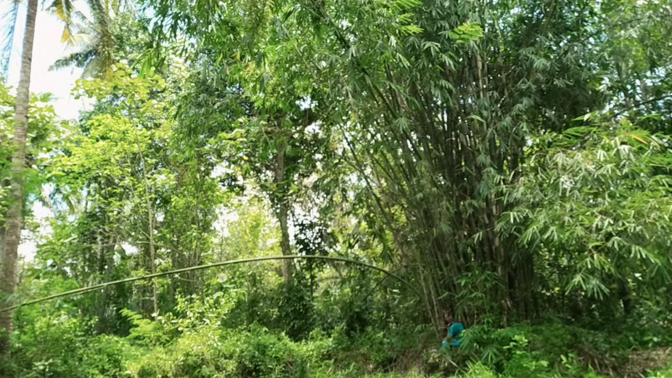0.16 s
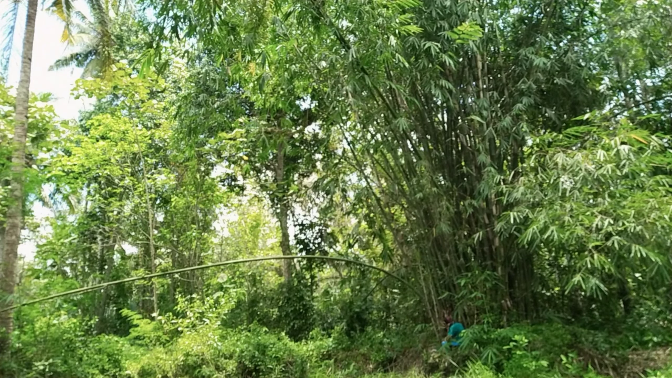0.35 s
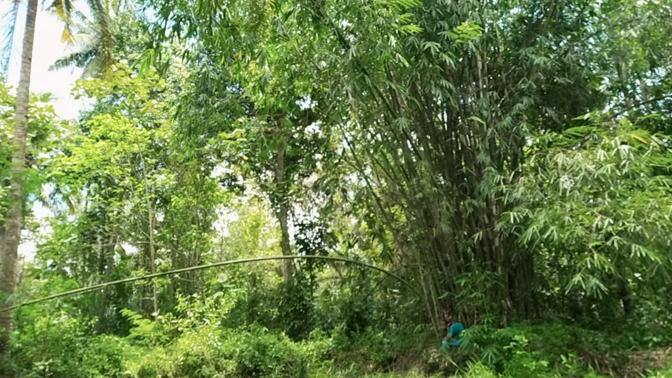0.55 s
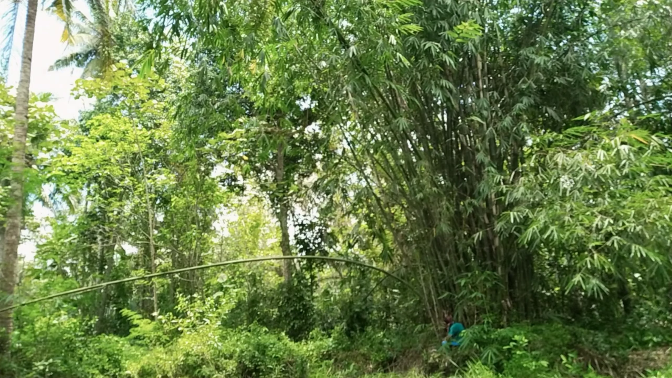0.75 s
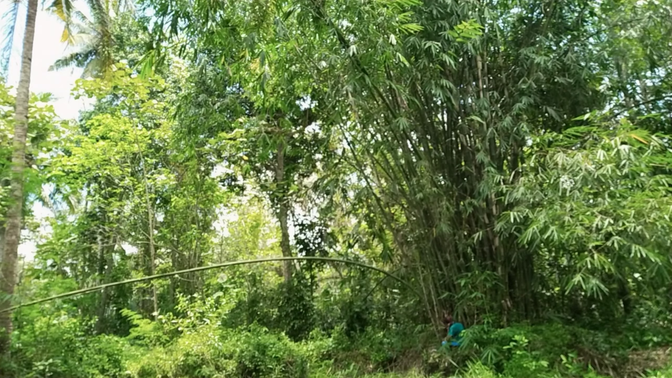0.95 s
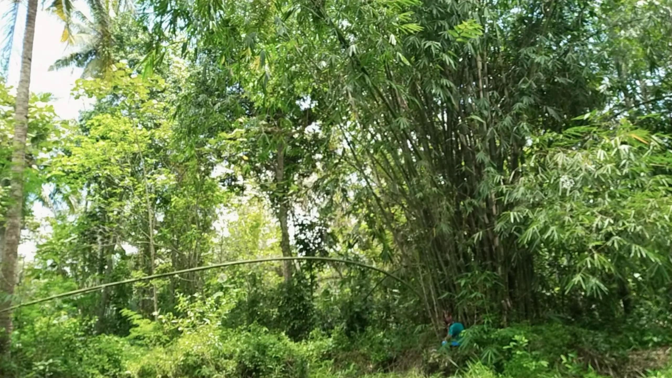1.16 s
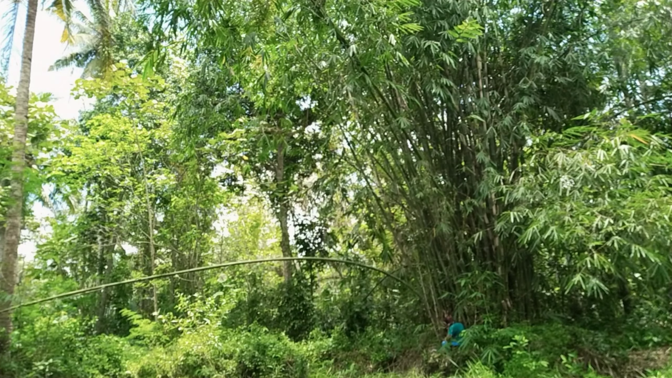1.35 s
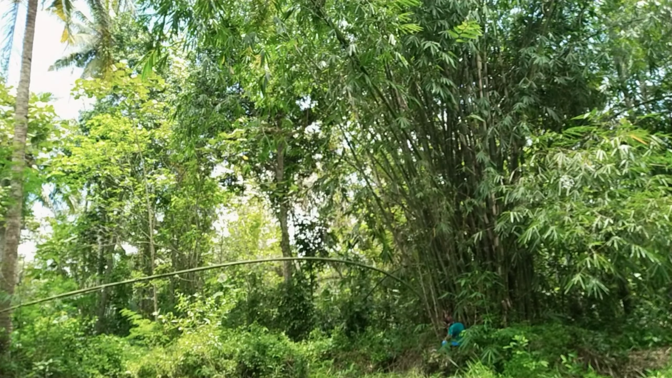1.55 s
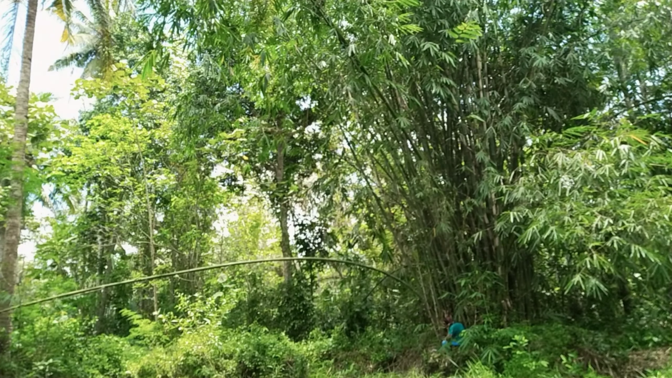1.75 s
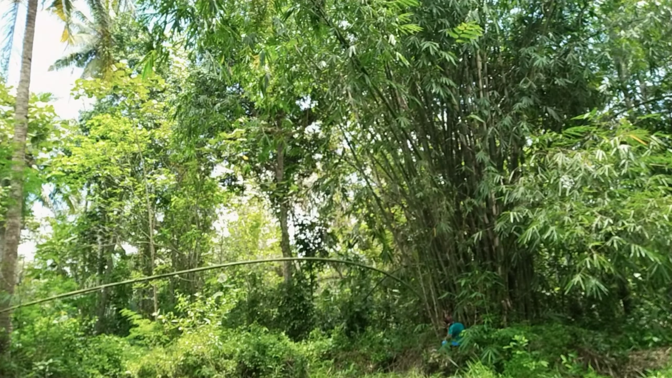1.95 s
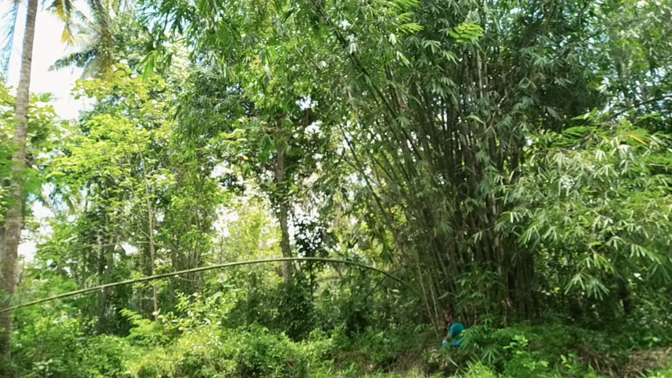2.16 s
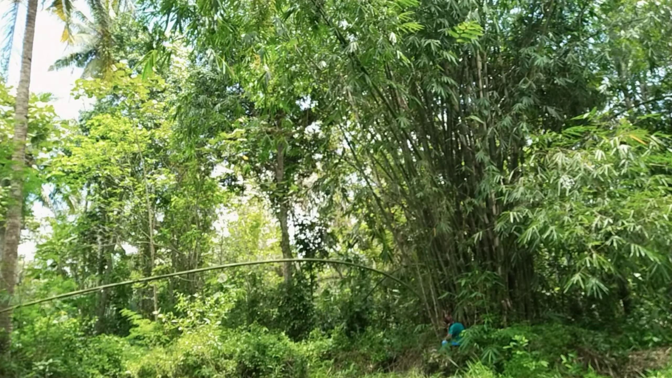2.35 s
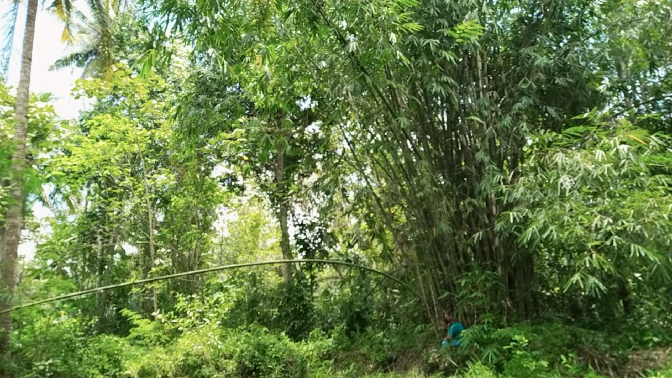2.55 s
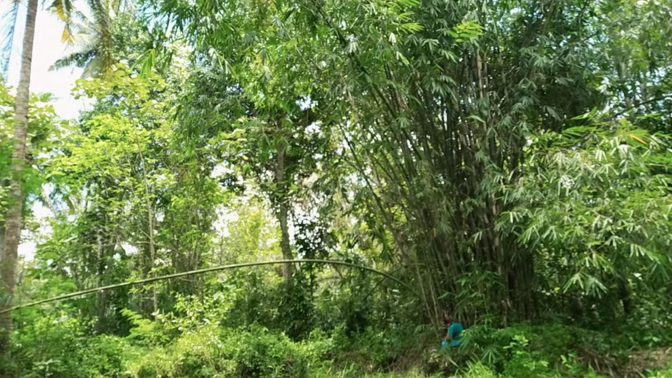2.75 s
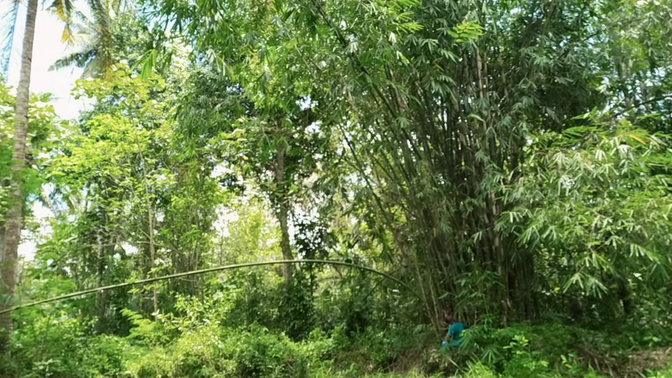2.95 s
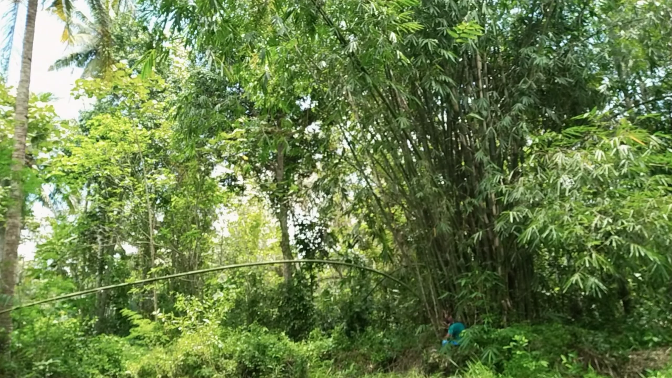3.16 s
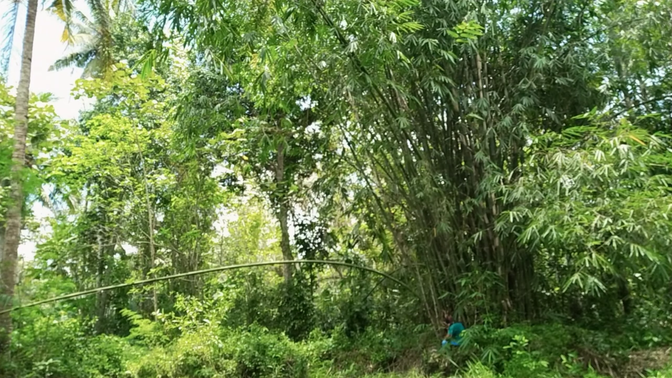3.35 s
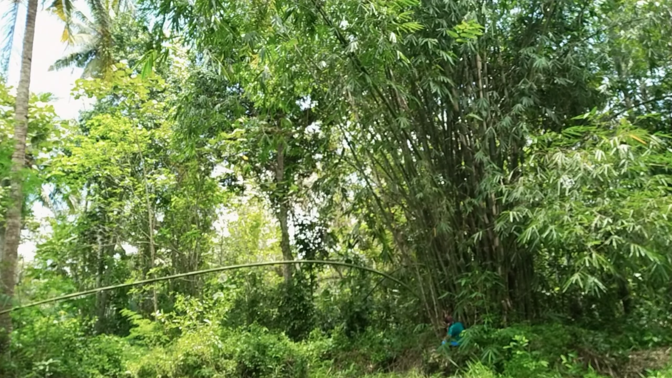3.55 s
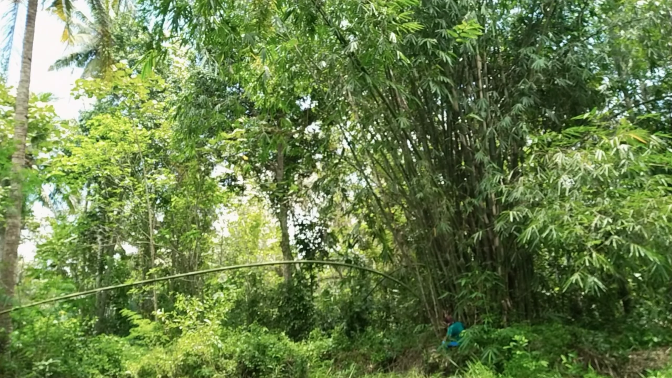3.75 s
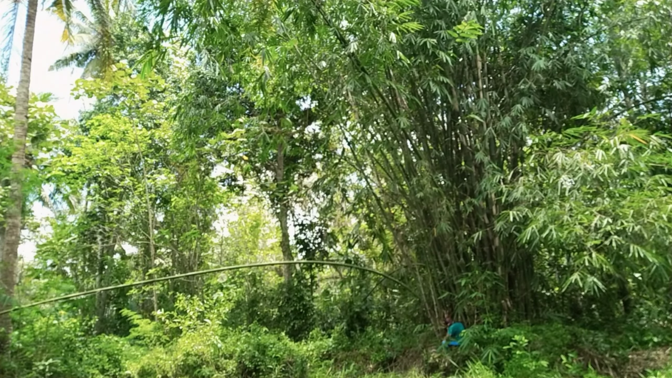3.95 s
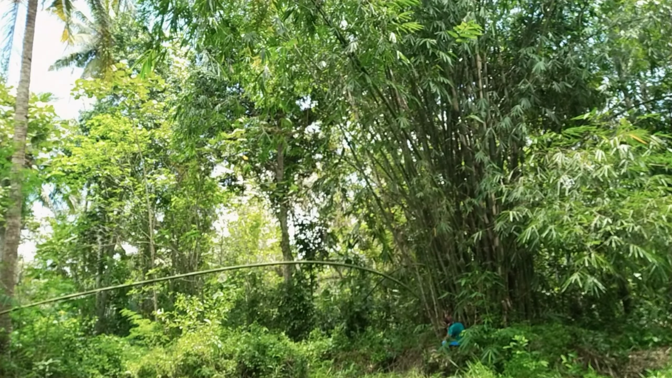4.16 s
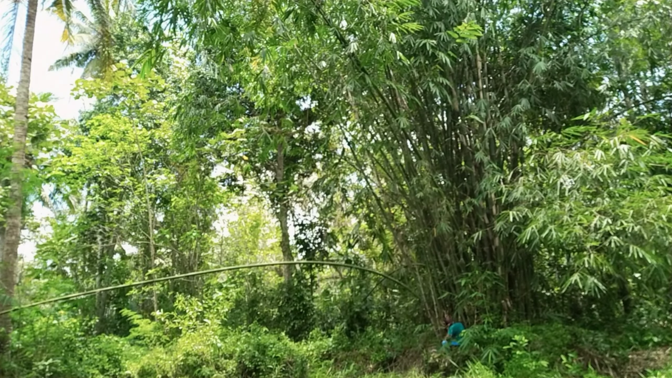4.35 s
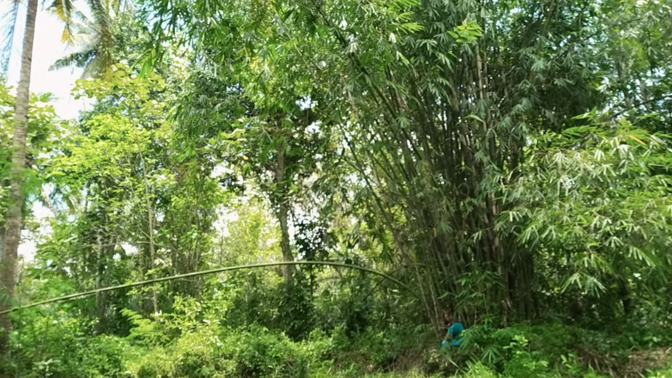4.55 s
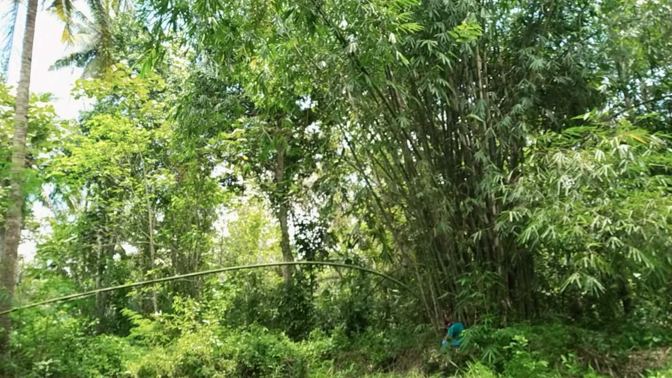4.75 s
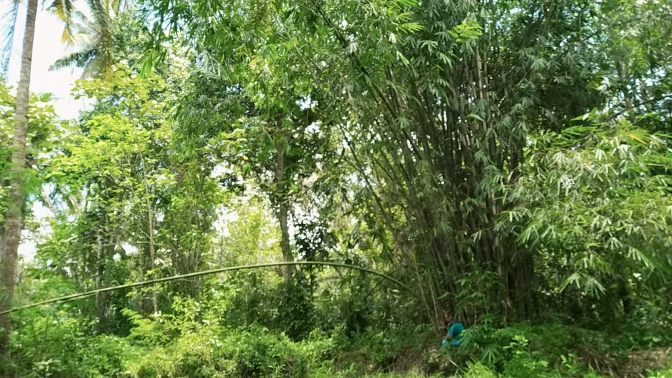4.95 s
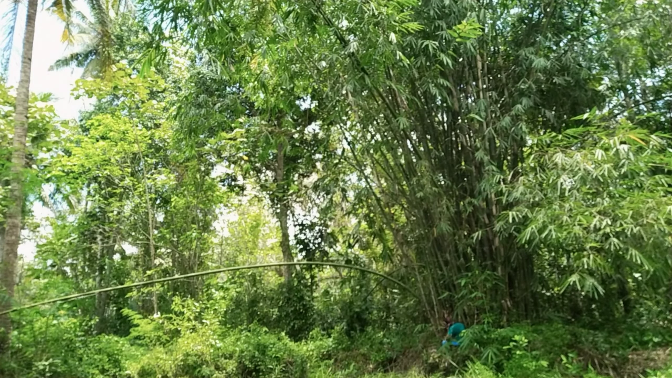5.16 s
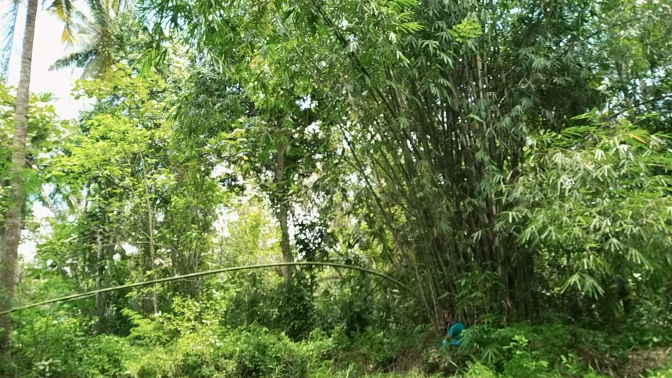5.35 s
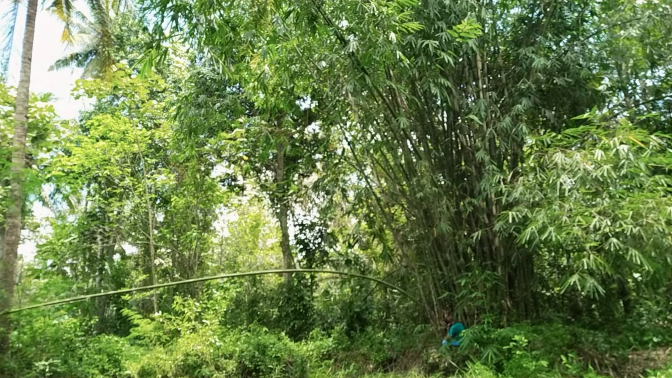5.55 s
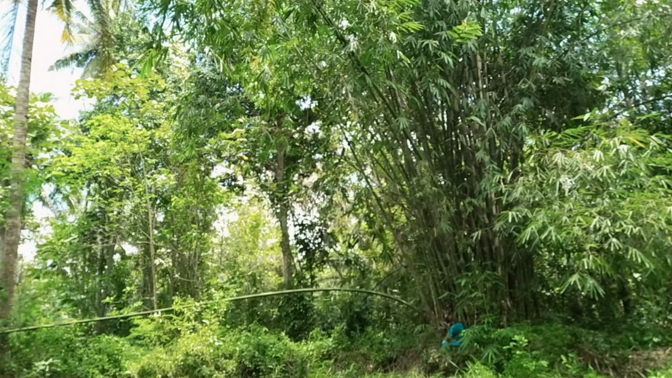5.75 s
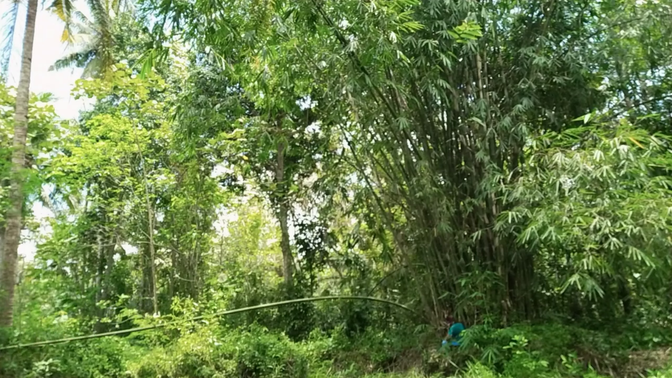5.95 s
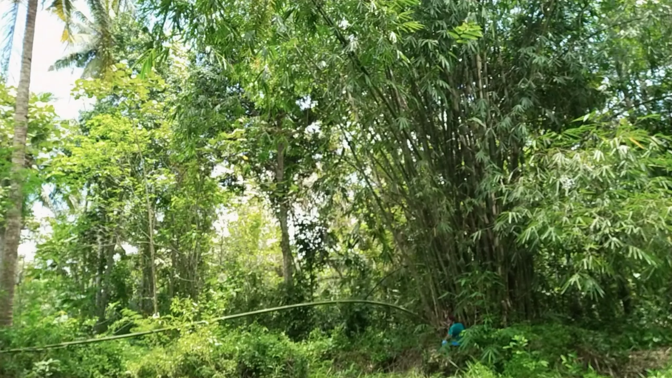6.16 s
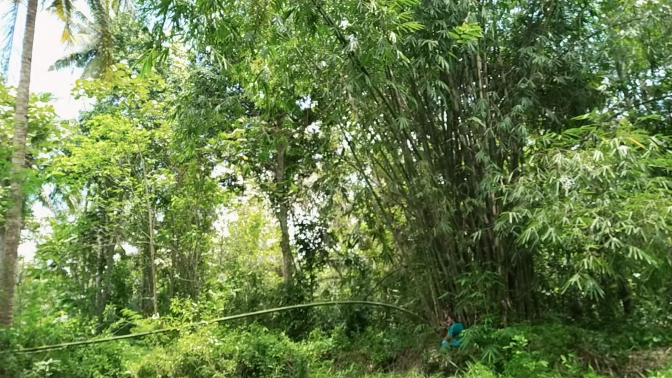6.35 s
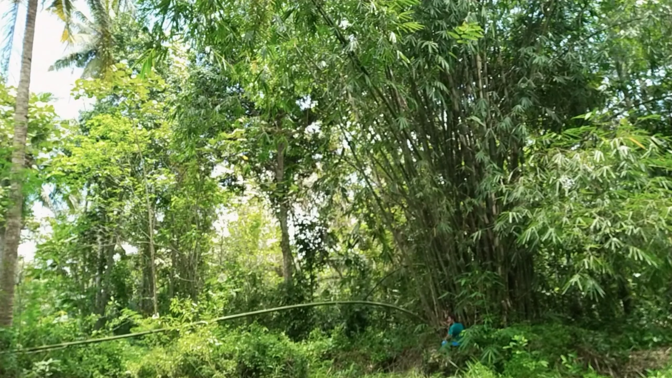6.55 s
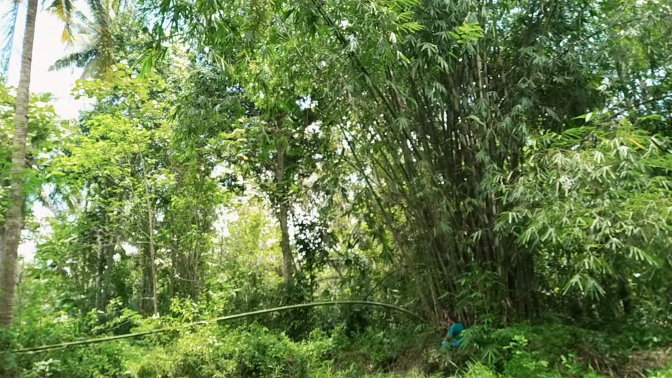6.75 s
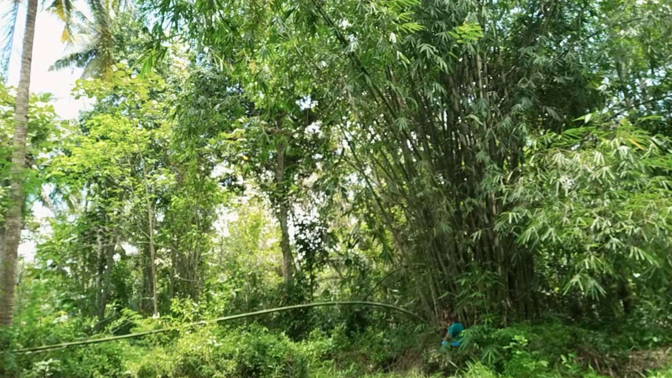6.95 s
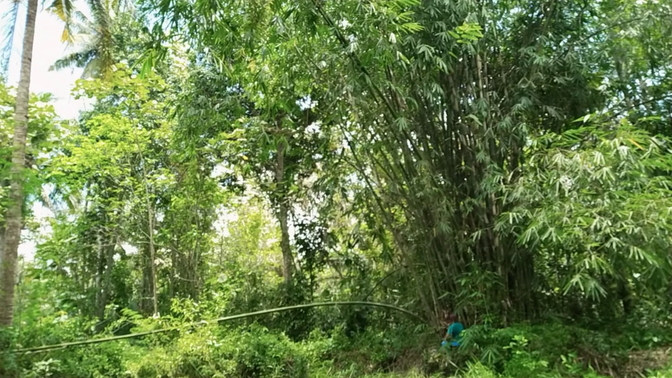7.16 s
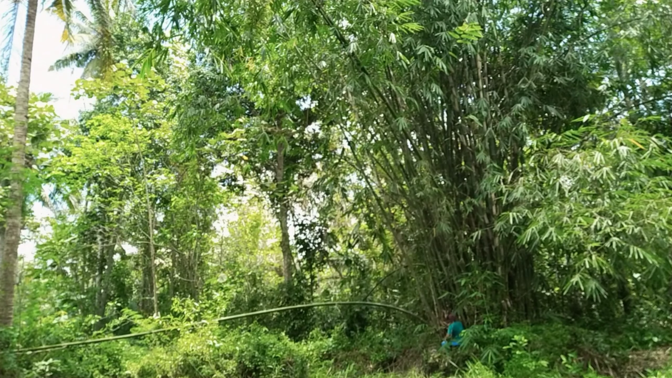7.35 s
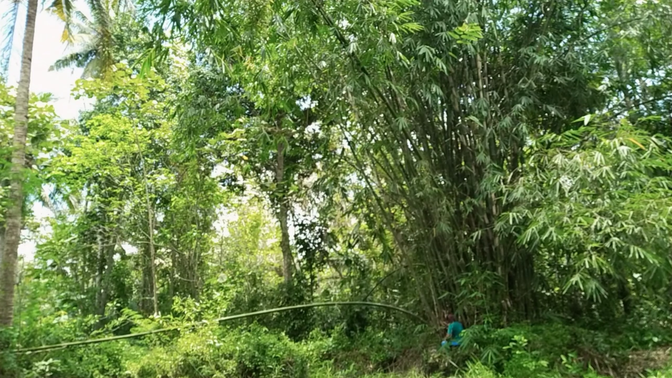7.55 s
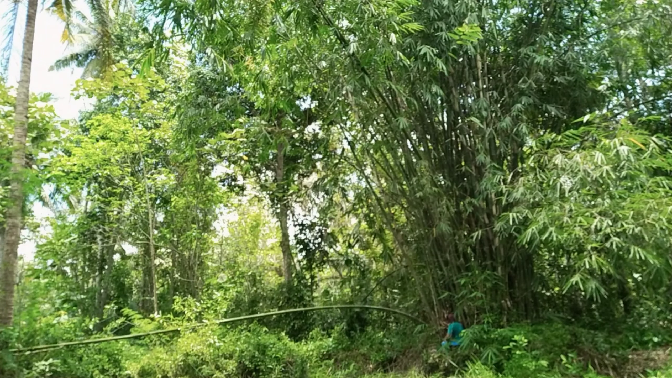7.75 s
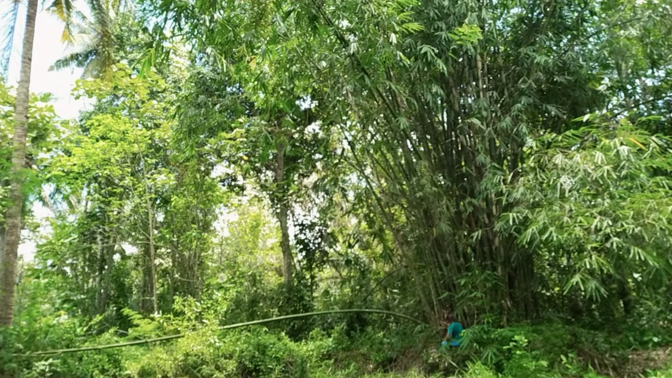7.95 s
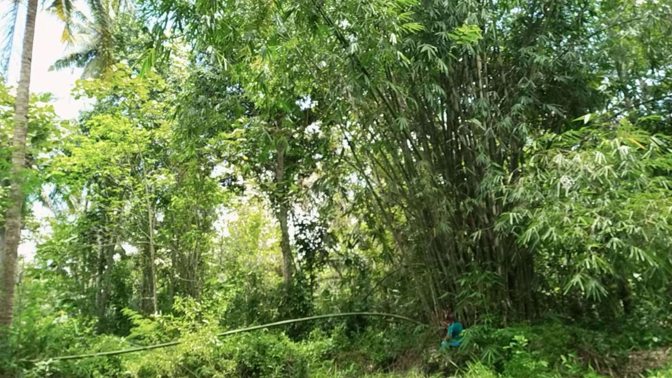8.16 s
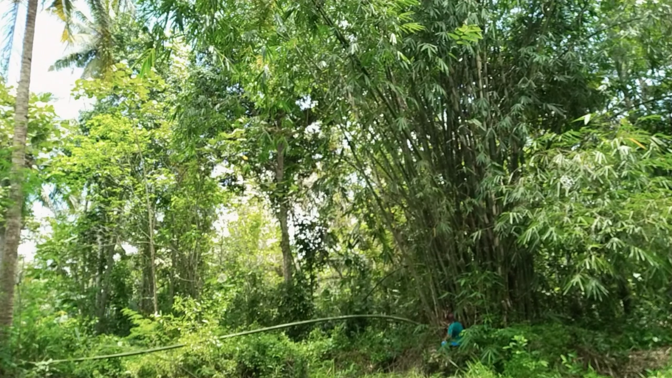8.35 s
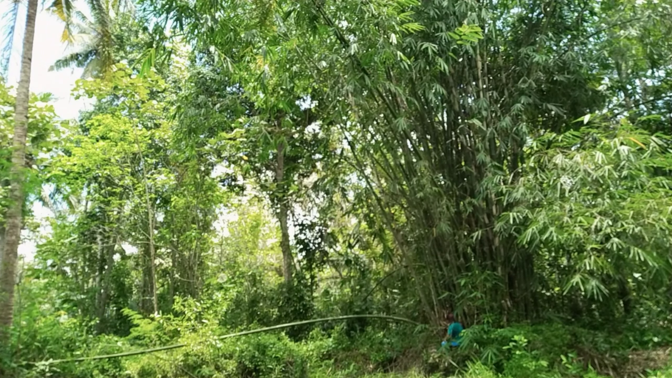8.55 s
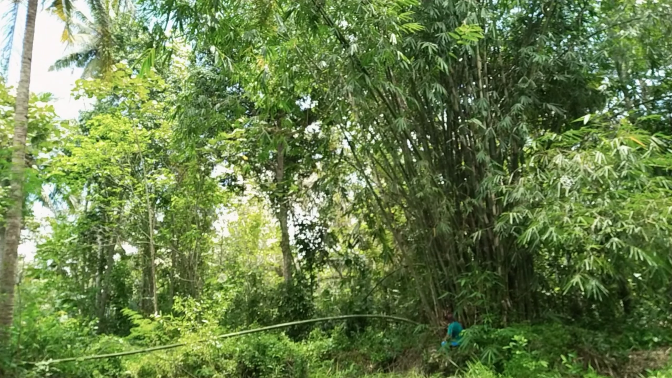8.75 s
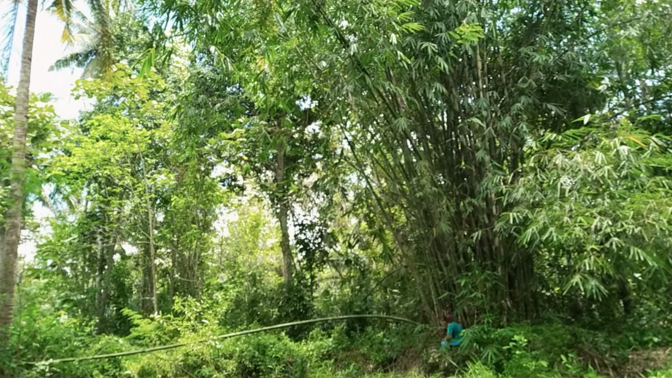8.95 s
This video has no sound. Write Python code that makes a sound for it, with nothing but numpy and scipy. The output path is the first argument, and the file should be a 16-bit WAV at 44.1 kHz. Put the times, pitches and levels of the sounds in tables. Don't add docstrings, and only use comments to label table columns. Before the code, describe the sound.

Distant blade chops hollow bamboo in a grove amid cicadas and birds, then a cut to close rustling leaves and one hard splitting crack.

```python
import sys
import numpy as np
from scipy import signal
from scipy.fft import rfft, irfft, next_fast_len
from scipy.io import wavfile
from scipy.ndimage import uniform_filter1d, map_coordinates

SR = 44100
rng = np.random.default_rng(int(sys.argv[2]) if len(sys.argv) > 2 else 0)


def generate_wav(signal):
    frames = np.transpose(np.atleast_2d(signal))
    scaled = np.clip(frames, -1, 1) * 32767
    pcm = np.round(scaled).astype(np.int16)
    wavfile.write(sys.argv[1], SR, pcm)


def voltage_ratio(level):
    return 10 ** (np.asarray(level, float) / 20)


N = 396900
TIME = np.arange(N) / SR
CUT_S = 5.8535

# (frequency [Hz], level [dB per Hz])
FAR_AIR = [(12, -39), (20, -10.5), (120, -1.5), (193, -6), (624, -26.5), (1570, -14.5), (2020, -18.5),
           (4300, -21), (5680, -25), (6360, -25.5), (8180, -31), (10500, -15), (11800, -39), (14700, -26),
           (16000, -37)]
NEAR_AIR = [(12, -34), (20, -1.5), (70, 0.5), (134, -6.5), (277, -21.5), (325, -23), (417, -23), (804, -14),
            (3510, -24.5), (4200, -38), (4500, -25.5), (5850, -39), (9900, -120)]
# (frequency [Hz], level [dB per Hz])
LEAVES = [(400, -24), (900, -16), (2100, -6), (4500, -12), (6500, -13.5), (8300, -8), (11000, -13.5),
          (14500, -7.5), (16000, -7)]
# (crest [s], level [dB], rise [s], fall [dB/s])
SHAKES = [
    (5.86, -50, .02, 30),
    (6.15, -57.5, 0.22, 15),
    (7.17, -64, .05, 70),
    (7.44, -58, 0.086, 90),
    (7.68, -45.5, 0.085, 42),
    (8.06, -51.5, 0.48, 28),
    (8.86, -66, 0.054, 52),
]
# (swell rate [1/s], time of one crest [s])
FAR_SINGERS = [(14.2, 1.555), (15.17, 4.097)]
# (time [s], level [dB])
CRICKET = [(0.1, -84), (0.9, -79), (1.25, -73), (1.7, -76), (2.7, -82), (3.0, -78), (3.4, -82), (3.55, -78),
           (4.2, -82), (5.0, -80), (5.8, -76)]
# (multiple of the wing stroke, level [dB])
WHINE_LINES = [(20, -13), (78, -8), (80, 0), (81, -13), (82, -17)]
# (time [s], level [dB], half width [s])
LOW_HUM = (-73.5, [(6.55, -64, 0.17), (7.72, -59.5, .1)])
HIGH_HUM = (-101, [(5.86, -66, .03), (6.62, -72, .1), (7.69, -77, .1), (8.67, -66.5, .07)])

# (length [s], start [Hz], end [Hz], how early the glide settles)
DROP = (.03, 5750, 2900, 1.18)
HOOK = (0.0214, 4500, 5300, 6)
LEAP = (.015, 3300, 6100, 0.11)
LOW_DROP = (0.031, 5000, 3150, 1.5)
CHIP = (0.0156, 4800, 4050, .5)
HIGH_DROP = (.03, 8000, 5600, .6)
# (frequency [Hz], level [dB])
THROAT = [(2800, -5), (3700, -6.5), (4500, 6), (5300, -2), (6200, -14)]
# (time [s], kind of note, level [dB])
VERSE = [
    (0, DROP, 3.5),
    (.051, HOOK, 2.5),
    (.096, HOOK, -3),
    (.111, LEAP, 2),
]
# (time [s], level [dB], change of opening drop [dB], delay of first hook [s])
VERSES = [
    (3.576, -55.5, -30, -0.006),
    (3.746, -54.5, 0, 0),
    (3.921, -55.5, -1, -0.005),
    (4.095, -56.5, -0.5, 0.00011),
]
# (time [s], kind of note, level [dB])
ENDING = [
    (0, (0.016, 4200, 4650, 8), 0.5),
    (.033, (0.027, 4300, 3950, 3), -6),
    (.06, (.022, 4700, 5500, 5.4), -9),
]
# (time [s], level [dB], pitch share)
ENDINGS = [
    (4.317, -52.5, 1.0),
    (4.478, -52.5, 0.96),
]
# (time [s], level [dB])
DROPS = [
    (1.105, -66),
    (1.288, -57),
    (1.458, -60),
    (2.515, -70.5),
    (3.584, -65),
    (5.245, -60),
]
# (time [s], level [dB], pitch
CHIPS = [(.548, -60, 1.26), (.89, -65.5, 1.01), (.93, -67, 1), (.965, -67, 0.98), (1.159, -64, 1.1),
         (1.38, -61, .95), (1.411, -61, 1.13), (2.405, -72, .96), (2.633, -68, 1.03), (2.73, -73, 1.01),
         (3.437, -72, 1.13), (5.073, -64, 0.87), (6.075, -55, 0.26)]
HIGH_DROPS = [
    (.487, -63.5, .93),
    (.51, -62, .98),
    (1.045, -71, .93),
    (2.03, -76, 1.2),
]
# (time [s], length [s], pitch [Hz], level [dB])
WHISTLES = [(0.558, .04, 5680, -69), (1.06, .093, 6000, -73), (1.262, .033, 7030, -68),
            (1.315, .03, 5340, -64), (1.358, 0.048, 6150, -64), (1.454, .036, 7000, -71),
            (1.527, .025, 6950, -63), (1.59, .03, 6970, -71), (1.596, .07, 5400, -72),
            (1.818, .035, 7000, -65), (1.88, .035, 5370, -69), (1.915, .024, 5950, -64),
            (2.0, .034, 5980, -71), (2.0, .04, 5400, -76), (2.097, .038, 6900, -68), (2.88, .03, 3450, -72),
            (3.265, .1, 7620, -77), (3.29, .045, 6350, -74), (3.34, .05, 7050, -76),
            (4.692, .03, 5060, -74), (7.381, 0.051, 3340, -62.5)]

# (frequency [Hz], level [dB per Hz])
FAR_EDGE = [(530, -36), (900, -18.5), (1790, -7.5), (2070, -10), (3230, -4.5), (3550, -8), (6110, -4.5),
            (9650, -1.5), (14900, 0.5), (16000, -11)]
NEAR_EDGE = [(590, -24.5), (1000, -2.5), (1400, -5), (1670, -6), (1810, -1.5), (3010, -2.5), (5630, -9.5),
             (7980, -1), (14900, 4.5), (16000, -40)]
# (frequency [Hz], width [Hz], level [dB])
FAR_WALL = [(1600, 710, -1), (2570, 460, 1.5), (3170, 290, 0.5), (4530, 790, 1), (6100, 1100, -3)]
NEAR_WALL = [(1330, 240, 4), (1880, 170, -0.5), (2220, 240, -1.5), (2900, 1100, -1), (8730, 1000, 3.5)]
# (frequency [Hz], width [Hz], level [dB])
FAR_CULM = [(146, 32, -3), (256, 39, -1), (431, 49, 2.5), (653, 51, 2.5)]
NEAR_CULM = [(105, 57, 2.5), (193, 37, 5.5), (787, 73, 17), (903, 79, 14.5), (1190, 200, -1)]
# (frequency [Hz], share of t60)
GROVE = [(300, 1.04), (1400, 0.86), (4000, 1.23), (8000, 1.0), (13000, 1.1)]
# (time [s], peak [dB], hollow knock [dB], brightness [dB], strongest ring of the cut [Hz])
CHOPS = [
    (0.1456, -26.5, -21, -12.5, 2740),
    (0.6198, -27, -12.5, -12, 3000),
    (1.1835, -27, -19, -12, 4460),
    (1.6755, -28, -16, -8, 4670),
    (2.1712, -28, -16.5, -14.5, 1300),
    (3.152, -27.5, -21, -10, 1590),
    (3.9564, -27.5, -17.5, -6, 1950),
    (4.4247, -28, -17, -4.5, 6100),
    (4.8866, -29, -16.5, 0.5, 5000),
    (5.3423, -27, -21, -16, 4600),
]
# (level [dB], t60 [s])
CHOP_SCATTER = (-16.5, 0.31)
# (time [s], peak [dB])
GRAZES = [
    (0.138, -50),
    (3.1454, -38.5),
    (3.949, -36),
    (4.8806, -34.5),
    (5.3336, -38.5),
    (5.3402, -33),
]
# (knock [dB], brightness [dB], scatter [dB], t60 [s])
GRAZE = (-24.5, -10, -12.5, 0.47)
# (time [s], peak [dB], brightness [dB], scatter [dB])
TEARS = [
    (2.2765, -33, -29, -14),
    (5.483, -32.5, -10, -13),
    (5.538, -50, 7, -9),
    (5.5785, -30, -9, -18),
    (5.609, -23.5, -2.5, -14.5),
    (5.6215, -37, -9, -10.5),
    (5.647, -36, -6, -16),
    (5.69, -55.5, 3, 6),
]
# (time [s], peak [dB], knock [dB], brightness [dB], scatter [dB])
SPLIT = [
    (7.5176, -29, -12.5, -34, -23),
    (7.5194, -11, -19, -14, -18),
    (7.5225, -16, -18, -21, -28),
    (7.5425, -17.5, -17.5, -13.5, -17),
    (7.665, -26, -25.5, -18, -14.5),
    (8.1264, -35, -27, -9, -15.5),
    (6.078, -41, -15.5, -30, -10),
]
# (time [s], peak [dB], brightness [dB])
TWIGS = [
    (5.8674, -44.5, 13),
    (5.888, -42.5, 1),
    (7.4538, -52, -2),
    (7.929, -47, 0),
    (8.2394, -48, 0),
    (8.8594, -52, 0),
]
# (knock [dB], scatter [dB], t60 [s])
TWIG = (-26, -13.5, 0.63)


def unit(x):
    return x / np.sqrt(np.mean(x ** 2) + 1e-20)


def along(points, hz):
    f, v = np.transpose(points)
    return np.interp(np.log(hz + 1), np.log(f + 1), v)


def wobble(rate):
    coarse = TIME[::16]
    knots = rng.standard_normal(int(N * rate / SR) + 4)
    return np.interp(TIME, coarse, map_coordinates(knots, [coarse * rate]))


def filtered(x, response):
    m = next_fast_len(len(x) + 4096)
    return irfft(rfft(x, m) * response(np.fft.rfftfreq(m, 1 / SR)), m)[:len(x)]


def modes(table):
    def response(f):
        total = 0
        for k, (centre, width, db) in enumerate(table):
            damping = 1j * f * width
            total = total + (-1) ** k * voltage_ratio(db) * damping / (centre * centre - f * f + damping)
        return total
    return response


def rush(spectrum, patchy_db, low_hz, top_hz):
    z = signal.stft(rng.standard_normal(N), nperseg=512)[2]
    field = uniform_filter1d(rng.standard_normal(z.shape), size=6, axis=0)
    field = uniform_filter1d(field, size=14, axis=1)
    x = signal.istft(z * voltage_ratio(patchy_db * unit(field)), nperseg=512)[1][:N]

    def colour(hz):
        edges = (1 + (low_hz / (hz + 1)) ** 6) * (1 + (hz / top_hz) ** 6)
        return voltage_ratio(along(spectrum, hz)) / np.sqrt(edges)
    return unit(filtered(x, colour))


def shrill(body, clicks_hz, depth, swell_hz, swell_db, crest_s):
    clicks = np.cos(2 * np.pi * np.cumsum(clicks_hz * (1 + 0.0496 * wobble(6))) / SR)
    swell = np.cos(2 * np.pi * swell_hz * (TIME - crest_s) + 0.4 * wobble(2.5))
    drive = rng.standard_normal(N) * np.exp(depth * clicks) * voltage_ratio(swell_db * swell)
    return unit(filtered(drive, lambda f: modes(body)(f) ** 2))


def village_drone():
    return voltage_ratio(-63.8 + 1.8 * wobble(9.5)) * rush(FAR_AIR, patchy_db=1.0, low_hz=33.6, top_hz=480)


def canopy_air():
    fall_end_s, rise_s, fall_db = 5.89, 0.25, 6
    lift_db = fall_db * np.clip(1 - (fall_end_s - TIME) / rise_s, 0, 1)
    return voltage_ratio(-67 + lift_db) * rush(FAR_AIR, patchy_db=0.25, low_hz=500, top_hz=17400)


def far_cicadas():
    body = [(9640, 1150, -6.5), (10670, 940, -3)]  # (frequency [Hz], width [Hz], level [dB])
    first, second = [shrill(body, clicks_hz=195, depth=0.28, swell_hz=rate, swell_db=4.0, crest_s=crest)
                     for rate, crest in FAR_SINGERS]
    return voltage_ratio(-71) * (first + voltage_ratio(-1.5) * second)


def far_cricket():
    turn = 2 * np.pi * np.cumsum(6470 + 50 * wobble(200)) / SR
    level_db = np.interp(TIME, *np.transpose(CRICKET)) + 2.5 * wobble(60)
    return voltage_ratio(level_db) * (np.sin(turn) + voltage_ratio(-7.5) * np.sin(2 * turn))


def near_wind():
    gusts = voltage_ratio(1.0 * wobble(8.2))
    return voltage_ratio(-58.5) * unit(gusts * rush(NEAR_AIR, patchy_db=0.4, low_hz=24.8, top_hz=303))


def rustle_db(rest_db):
    power = voltage_ratio(2 * rest_db)
    for crest, db, rise, fall in SHAKES:
        shake = db - np.where(TIME < crest, 20 * (crest - TIME) / rise, fall * (TIME - crest))
        power = power + voltage_ratio(2 * shake)
    return 10 * np.log10(power)


def near_foliage():
    rest_db, air_follows = -67, 0.19
    leaves_db = rustle_db(rest_db)
    air_db = -62.5 + air_follows * (leaves_db - rest_db)
    air = voltage_ratio(air_db) * rush(NEAR_AIR, patchy_db=1.7, low_hz=340, top_hz=5000)
    ticks = voltage_ratio(1.5 * wobble(500) + 0.6 * wobble(25))
    leaves = unit(ticks * rush(LEAVES, patchy_db=0.3, low_hz=694, top_hz=16900))
    return air + voltage_ratio(leaves_db) * leaves


def swells(rest_db, rows):
    power = voltage_ratio(2 * rest_db)
    for s, db, half in rows:
        power = power + voltage_ratio(2 * db) * np.exp(-((TIME - s) / half) ** 2)
    return 10 * np.log10(power)


def hums():
    low = shrill([(769, 140, 0)], clicks_hz=60.6, depth=0.2, swell_hz=2.1, swell_db=1.0, crest_s=6.5)
    high = shrill([(3420, 150, 0)], clicks_hz=170, depth=0.2, swell_hz=4, swell_db=2.0, crest_s=6.6)
    return voltage_ratio(swells(*LOW_HUM)) * low + voltage_ratio(swells(*HIGH_HUM)) * high


def whine():
    pitch_hz, sway_hz, sway_s, lowest_s = 13650, 68, 1.47, 6.48
    turn = 2 * np.pi * (TIME - lowest_s) / sway_s
    pitch = pitch_hz - sway_hz * np.cos(turn + 0.15 * (1 - np.cos(turn)))
    stroke = 2 * np.pi * np.cumsum(pitch + 6 * wobble(60)) / SR / 80
    lines = sum(voltage_ratio(db + 3.6 * wobble(28)) * np.sin(k * stroke) for k, db in WHINE_LINES)
    return voltage_ratio(-64 + 0.8 * wobble(4.6)) * lines


def near_cicada():
    body = [(5120, 750, -1.5), (5650, 700, 0), (10200, 900, -8.5)]  # (frequency [Hz], width [Hz], level [dB])
    return voltage_ratio(-59.5) * shrill(body, clicks_hz=103, depth=0.45, swell_hz=8.28, swell_db=2.8, crest_s=7.392)


def song():
    notes = []
    for s, db, opening_db, late in VERSES:
        for k, (ds, kind, ddb) in enumerate(VERSE):
            notes.append((s + ds + late * (k == 1), kind, db + ddb + opening_db * (k == 0), 1, 1))
    for s, db, share in ENDINGS:
        notes += [(s + ds, kind, db + ddb, share, 1) for ds, kind, ddb in ENDING]
    notes += [(s, CHIP, db, share, 0) for s, db, share in CHIPS]
    notes += [(s, HIGH_DROP, db, share, 0) for s, db, share in HIGH_DROPS]
    notes += [(s, (length, hz, 0.99 * hz, 1), db, 1, 0) for s, length, hz, db in WHISTLES]
    return notes + [(s, LOW_DROP, db, 1, 0) for s, db in DROPS]


def birds():
    dry = np.zeros(N + SR)
    for s, (length, from_hz, to_hz, settle), db, share, near in song():
        u = np.linspace(0, 1, round(length * SR))
        glide = (1 - np.exp(-settle * u)) / (1 - np.exp(-settle))
        hz = share * from_hz * (to_hz / from_hz) ** glide
        hz = hz * voltage_ratio(0.08 * near * rng.standard_normal())
        shape = np.sin(np.pi * u ** 0.59) ** 0.77 * voltage_ratio(near * along(THROAT, hz))
        dry[round(s * SR):][:len(u)] += voltage_ratio(db) * shape * np.sin(2 * np.pi * np.cumsum(hz) / SR)
    t = TIME[:SR // 2]
    echo = rng.standard_normal(len(t)) * voltage_ratio(-60 * t / 0.42)
    smeared = signal.fftconvolve(dry, echo / np.linalg.norm(echo))[:N]
    return voltage_ratio(2.5 * wobble(220)) * (dry[:N] + voltage_ratio(-1.5) * smeared)


def snapping_fibres(t, rise, t60, echo_s, echo_db):
    noise = rng.standard_normal(len(t))
    crack = rise * noise * np.abs(noise) ** 0.5 * voltage_ratio(-60 * t / t60)
    crack = crack / np.linalg.norm(crack) * 4
    return crack + voltage_ratio(echo_db) * np.roll(crack, round(echo_s * SR))


def stem_scatter(t, rise, db, t60):
    hz, frames, z = signal.stft(rng.standard_normal(len(t)), SR, nperseg=256)
    z = z * voltage_ratio(-60 * frames / (t60 * along(GROVE, hz)[:, None]))
    tail = signal.istft(z, SR, nperseg=256)[1][:len(t)]
    grain = voltage_ratio(18 * uniform_filter1d(rng.standard_normal(len(t)), size=130))
    return voltage_ratio(db - 4.0) * rise * grain * tail * (1 - 2 * t)


def struck_wall(wall, rings, f):
    struck = []
    for centre, width, db in wall:
        shift, lift = rng.standard_normal(2)
        struck.append((centre * voltage_ratio(0.4 * shift), width, db + 2.2 * lift))
    own = [(centre, 280, 2.5) for centre in rings]
    return 0.6 + np.abs(modes(struck)(f)) + np.abs(modes(own)(f))


def blows(table, edge, wall, culm, crack_t60, echo_s, echo_db):
    out = np.zeros(N + SR)
    t = TIME[:SR // 2]
    f = np.fft.rfftfreq(len(t), 1 / SR)
    delay = np.exp(-2j * np.pi * f * 64 / SR)
    sharp, hollow = voltage_ratio(along(edge, f)) * delay, modes(culm)(f) * delay
    rise = 1 - np.exp(-(t / 0.00074) ** 2)
    for s, db, knock_db, top_db, scatter_db, t60, *rings in table:
        wood = sharp * struck_wall(wall, rings, f)
        lift_db = top_db / (1 + (8000 / (f + 1)) ** 6)
        crack = snapping_fibres(t, rise, crack_t60, echo_s, echo_db)
        scatter = stem_scatter(t, rise, scatter_db, t60)
        shove = t / 0.00048 * np.exp(-t / 0.00037) + 0.75 * scatter
        bright = wood * (rfft(crack) * voltage_ratio(lift_db) + rfft(scatter) * voltage_ratio(0.59 * lift_db))
        knock = voltage_ratio(knock_db + 12.5) * hollow * rfft(shove)
        out[round(s * SR) - 85:][:len(t)] += voltage_ratio(db + 7.0) * irfft(bright + knock, len(t))
    return out[:N]


def near_blows():
    split = [(*crack, 0.63 + 0.02 * (crack[1] + 10)) for crack in SPLIT]
    twigs = [(s, db, TWIG[0], top_db, *TWIG[1:]) for s, db, top_db in TWIGS]
    return blows(split + twigs, NEAR_EDGE, NEAR_WALL, NEAR_CULM, crack_t60=0.03, echo_s=0.0096, echo_db=-11)


def far_blows():
    chops = [(*chop, *CHOP_SCATTER, ring_hz) for *chop, ring_hz in CHOPS]
    grazes = [(*graze, *GRAZE) for graze in GRAZES]
    tears = [(s, db, -41, top_db, scatter_db, 0.35 + 0.015 * (scatter_db + 13.5))
             for s, db, top_db, scatter_db in TEARS]
    return blows(chops + grazes + tears, FAR_EDGE, FAR_WALL, FAR_CULM,
                 crack_t60=0.0105, echo_s=0.0135, echo_db=-11)


def scene():
    far = village_drone() + canopy_air() + far_cicadas() + far_cricket() + far_blows()
    near = near_wind() + near_foliage() + hums() + whine() + near_cicada() + near_blows()
    mono = np.where(TIME < CUT_S, far, near) + birds()
    return np.array([mono, mono])


def band_limit(x):
    return signal.sosfilt(signal.butter(12, 16650, fs=SR, output="sos"), x)


def record(dry):
    top_hz = 15540
    soft = dry[0] / (1 + np.abs(dry[0] / 0.24) ** 3) ** (1 / 3)
    low = filtered(soft, lambda hz: hz < top_hz)
    high = soft - low
    level = np.sqrt(np.abs(uniform_filter1d(high ** 2, size=500)))
    attack = level / (2.5 * uniform_filter1d(level, size=6000) + 1e-9)
    gate = attack ** 8 / (1 + attack ** 8)
    mono = low + voltage_ratio(-14) * high * gate
    return band_limit(np.array([mono, mono]))


dry = scene()
out = record(dry)
generate_wav(out)
```